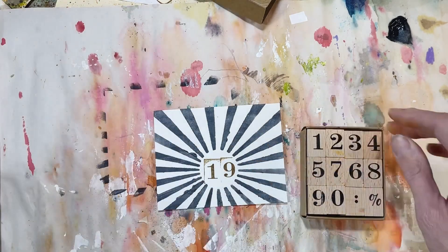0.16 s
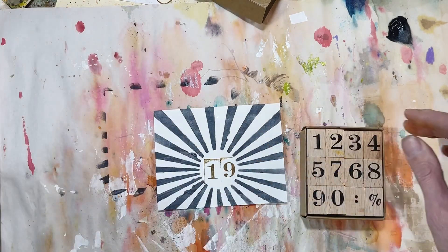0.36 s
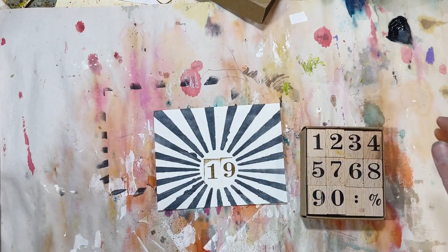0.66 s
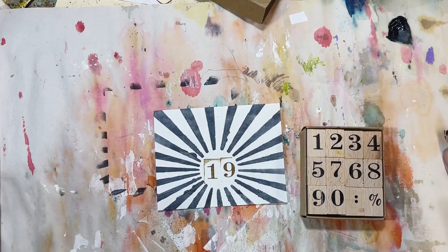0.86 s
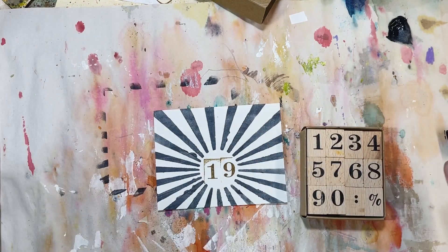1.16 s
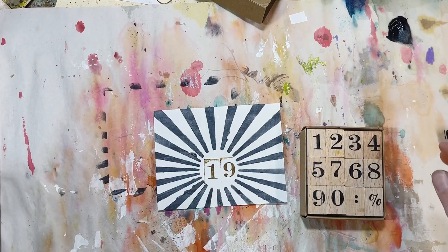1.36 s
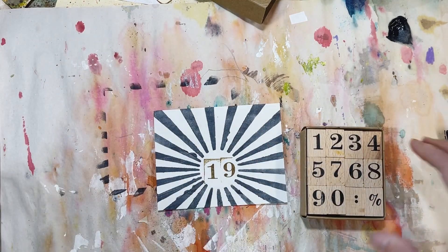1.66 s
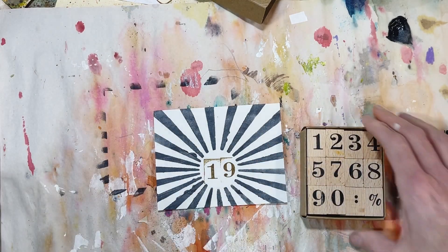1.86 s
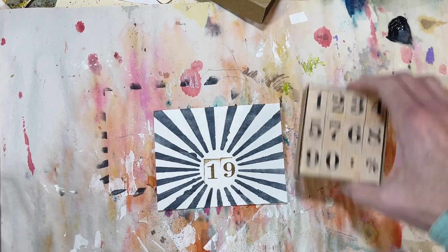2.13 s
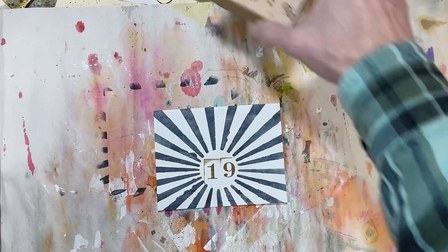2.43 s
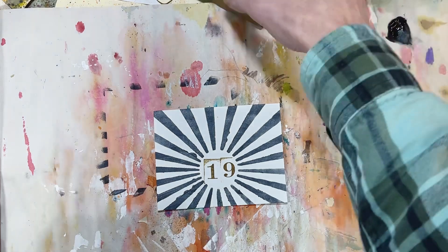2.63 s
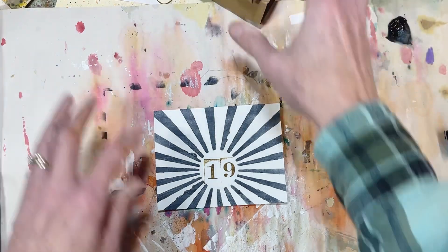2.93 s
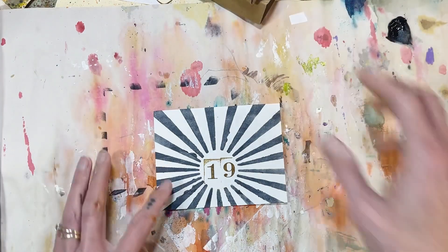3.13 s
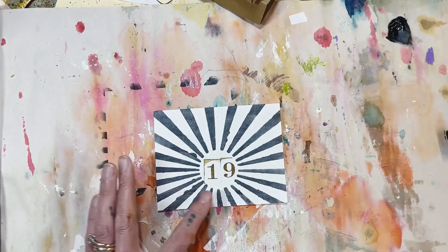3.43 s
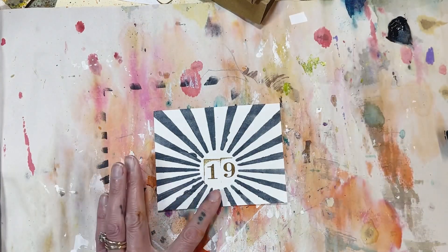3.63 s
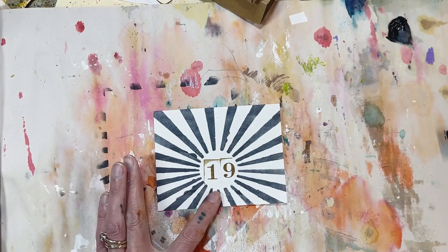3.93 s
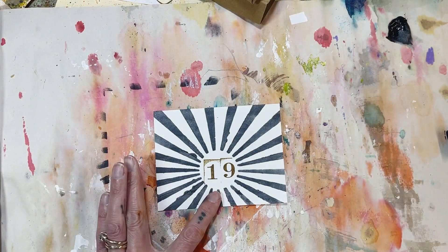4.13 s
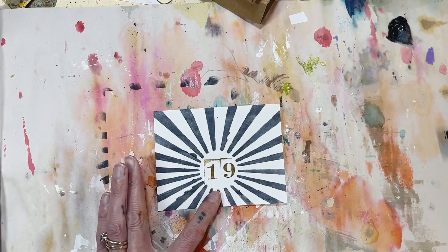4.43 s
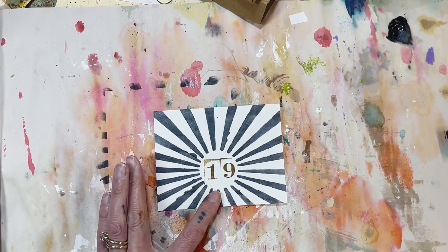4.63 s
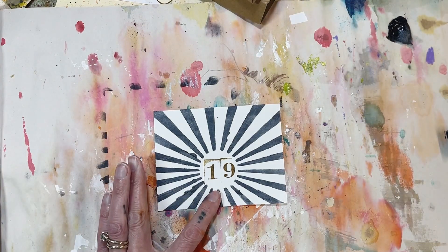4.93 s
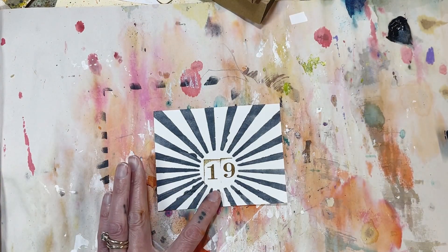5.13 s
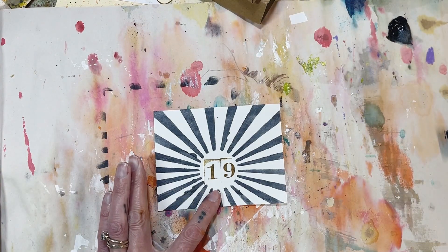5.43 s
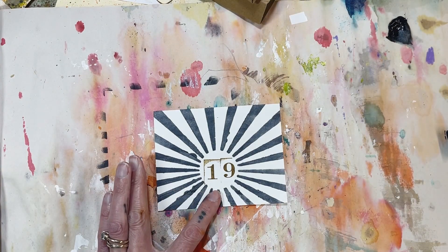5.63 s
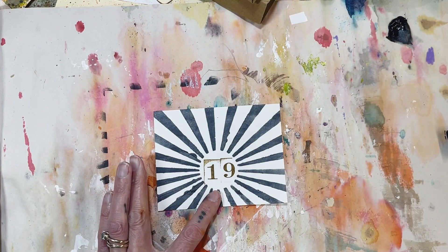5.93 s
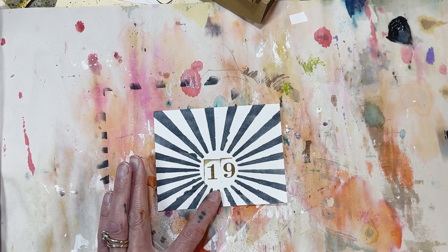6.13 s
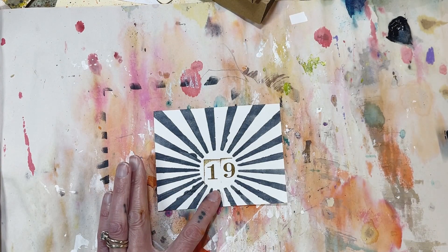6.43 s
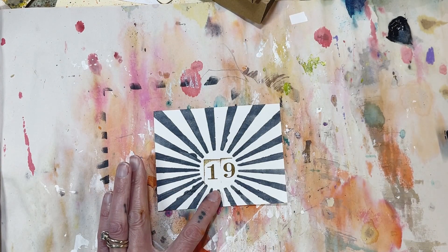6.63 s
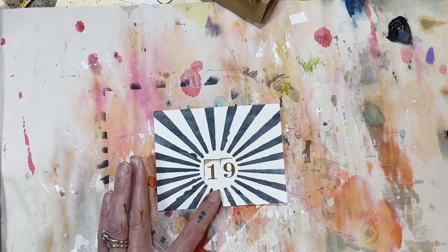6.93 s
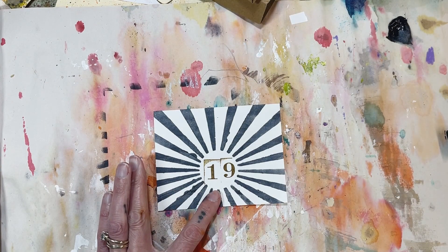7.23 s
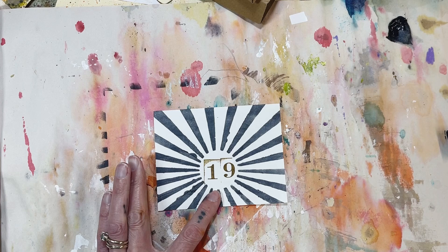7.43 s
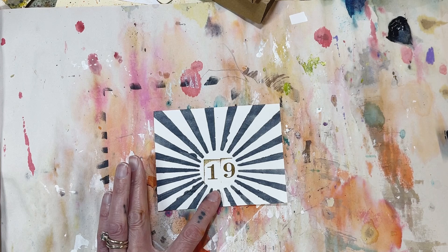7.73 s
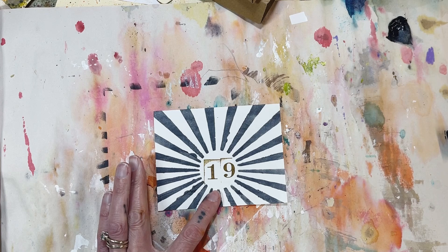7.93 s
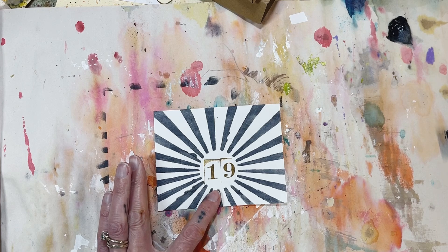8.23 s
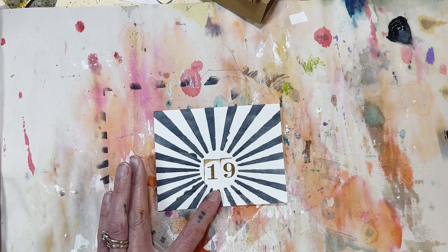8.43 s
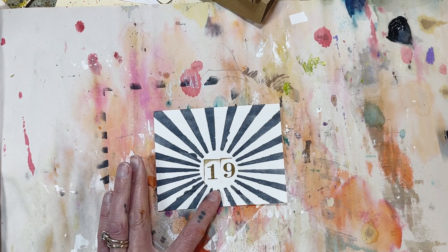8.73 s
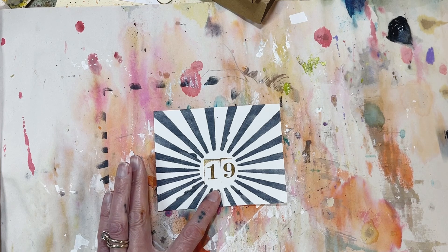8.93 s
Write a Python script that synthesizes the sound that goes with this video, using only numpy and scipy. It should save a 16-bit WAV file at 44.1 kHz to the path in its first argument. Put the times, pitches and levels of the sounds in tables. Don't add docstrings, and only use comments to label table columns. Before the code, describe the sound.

Throughout, a tiny camera focus motor chatters in a quick, slightly uneven tick-click-tick, roughly eight or nine cycles a second, with a thin whir and soft hiss. Faint hand brushing opens the scene. At 1.2 s a heavy dull table thump lands with a woody knock; a brighter crack and strong slide follow at 1.35, lighter taps at 1.6 and 1.75. The box is set down around 2.15-2.25, and knocked and slid at 2.6. A barely audible low hum lasts from 1.8 to 3.5. Hands are then nearly still, with faint rubs near 4.1. Pad knocks and scrapes come at 4.85 and 5.55-5.8. From 6.2, sharp taps and film crackles, snapping at 6.38; the crispest crackling burst runs 7.25-7.55. Smaller rustles come at 8.3; at 8.85 a snap and tiny high squeak, then a last knock at 9.03. Close microphone, small dry room.

```python
import sys
import numpy as np
from scipy import signal
from scipy.fft import rfft, irfft, next_fast_len
from scipy.io import wavfile
from scipy.ndimage import uniform_filter1d

SR = 44100
rng = np.random.default_rng(int(sys.argv[2]) if len(sys.argv) > 2 else 0)


def attenuation_scalar(level_db):
    decades = np.asarray(level_db, float) / 20
    return 10 ** decades


def inscribe(sig):
    pcm = np.round(np.clip(np.atleast_2d(sig).T, -1, 1) * 32767)
    wavfile.write(sys.argv[1], SR, pcm.astype(np.int16))


N = 400428


def evened(x):
    return x / np.sqrt(np.mean(x ** 2) + 1e-20)


def read(points, hz):
    f, value = np.transpose(points)
    return np.interp(np.log(hz + 1), np.log(f + 1), value)


def colour(x, points):
    size = next_fast_len(x.shape[-1])
    gain = attenuation_scalar(read(points, np.fft.rfftfreq(size, 1 / SR)))
    return irfft(rfft(x, size) * gain, size)[..., :x.shape[-1]]


def add(mix, s, sound):
    part = mix[max(round(s * SR), 0):][:len(sound)]
    part += sound[:len(part)]


def smooth_noise(count, width):
    noise = rng.standard_normal(count)
    return evened(uniform_filter1d(uniform_filter1d(noise, width), width))


def ring(modes, size=6000):
    t = np.arange(size) / SR
    h = np.zeros(size)
    for k, (hz, db, t60) in enumerate(modes):
        h += (-1) ** k * attenuation_scalar(db - 60 * t / t60) * np.sin(2 * np.pi * hz * t)
    return h / np.linalg.norm(h)


# [f/Hz, level/dB]
FLOOR = [(15, -51), (25, -29), (81, 11), (628, 6), (904, 30), (1060, -7), (1970, 25), (2630, -6),
         (5440, -73), (6870, 9.5), (8910, -19), (10200, -78), (12500, -63), (16200, -74), (22000, -120)]


def quiet_floor():
    hiss = rng.standard_normal((3, N))
    hiss = hiss[0] + .1 * hiss[1:]
    return attenuation_scalar(-72) * evened(colour(hiss, FLOOR))


# [t/s, level/dB]
HUM_LEVEL = [
    (1.8, -70),
    (1.842, -75),
    (2.13, -70),
    (3.55, -75),
]


def hum():
    s, db = np.transpose(HUM_LEVEL)
    t = np.arange(N) / SR
    level = attenuation_scalar(np.interp(t, s, db, -120, -120))
    return level * np.sqrt(2) * np.sin(2 * np.pi * 148 * t)


def room(x, t60=0.11):
    taps = rng.choice([-1., 1.], (2, 16000)) * (rng.random((2, 16000)) < .06)
    taps[:, :150] = 0
    hz, t, z = signal.stft(taps, SR, nperseg=256)
    differ = np.minimum(hz / 700, 1) ** 2 / (1 + (hz / 6000) ** 4)
    z[1] = z[0] + z[1] * differ[:, None]
    t60_by_pitch = t60 * (2000 / (hz[:, None] + 200)) ** 0.34
    tail = signal.istft(z * attenuation_scalar(-60 * t / t60_by_pitch), SR, nperseg=256)[1]
    return signal.oaconvolve(x[None], tail / np.linalg.norm(tail[0]), axes=1)[:, :N]


HUNT_AT_BOX = [-0.033, 0.087, 0.216, 0.356, 0.488, 0.626, 0.762, 0.894, 1.007, 1.111, 1.21, 1.335, 1.46,
               1.571, 1.706, 1.845, 1.973, 2.105, 2.237, 2.351, 2.456, 2.557, 2.668, 2.786, 2.912, 3.027,
               3.15]
HUNT_MIDDLE = [3.283, 3.404, 3.517, 3.628, 3.73, 3.835, 3.946, 4.059, 4.174, 4.302, 4.414, 4.532, 4.652,
               4.761, 4.863, 4.974, 5.078, 5.183, 5.291, 5.399, 5.518, 5.634, 5.743, 5.853, 5.962]
HUNT_UNWRAPPING = [6.073, 6.182, 6.295, 6.401, 6.515, 6.624, 6.736, 6.846, 6.967, 7.075, 7.183, 7.301,
                   7.413, 7.53, 7.648, 7.766, 7.879, 7.995, 8.11, 8.22, 8.324, 8.442, 8.559, 8.686, 8.828,
                   8.933, 9.06]


def hunting():
    out = np.array(HUNT_AT_BOX + HUNT_MIDDLE + HUNT_UNWRAPPING)
    back = out[:-1] + .0235 + .3 * np.diff(out)
    latch = back[1:] - .0265 + .002 * rng.standard_normal(len(back) - 1)
    return out[1:], back, latch


def gears(times, level_db, points, bite_db, hold_ms, fall_ms, jolt_db):
    ms, out = np.arange(3000) * 1000 / SR, np.zeros(N)
    for s in times:
        uneven_teeth = attenuation_scalar(0.72 * rng.standard_normal(len(ms)))
        clicks = rng.standard_normal(len(ms)) * uneven_teeth
        longer, harder = rng.uniform(-1, 1, 2)
        stop = hold_ms * (1 + 0.2 * longer)
        after = np.maximum(ms - stop, 0)
        shape = np.minimum(ms / .8, 1)
        shape = shape * (np.exp(-after / fall_ms) + 0.24 * np.exp(-after / 13))
        accents_db = bite_db * np.exp(-ms / 2.06) + jolt_db * np.exp(-((ms - stop) / 4.5) ** 2)
        add(out, s + .0008, attenuation_scalar(level_db + 1.7 * harder + accents_db) * shape * clicks)
    return colour(out, points)


# [f/Hz, level/dB]
HOUSING = [(770, -8), (1310, -8), (4480, -2), (915, -4), (1152, -4.5), (1507, -2.5), (1765, -5.5),
           (1937, 0.5), (2088, -0.5), (2217, -0.5), (2390, -5), (2659, -20), (2810, -13), (3057, -46),
           (3305, -8.5), (3854, -4), (4048, -8), (4748, 0), (5114, -15), (6147, -6), (6826, -0.5),
           (7504, 3), (8096, -5.5), (8484, 2), (8624, -18), (8936, 9), (9302, -46), (9808, -4), (10314, -2)]
# [f/Hz, level/dB]
OUT_COLOUR = [(550, -9.5), (750, -3), (3000, 3.5), (8000, 8), (10000, 6.5), (11000, 0), (12500, -33)]
# [f/Hz, level/dB]
BACK_COLOUR = [(550, -8.5), (750, -2), (3000, 6.5), (8000, 8), (10000, -0.5), (11000, 0.5), (12500, -44)]
# [f/Hz, level/dB]
LATCH_COLOUR = [(1000, -31), (5000, -18), (6500, -1), (8000, -12), (9500, 4), (11000, -14), (13500, -45)]
# [f/Hz, level/dB, t60/s]
WHIR = [
    (2110, 1.5, 0.0089),
    (4080, 2.5, 0.0041),
]


def focus_motor():
    out, back, latch = hunting()
    drive = gears(out, -47.5, OUT_COLOUR, bite_db=6.5, hold_ms=8.94, fall_ms=3.9, jolt_db=5)
    drive += gears(back, -45.5, BACK_COLOUR, bite_db=2.5, hold_ms=5.6, fall_ms=2.9, jolt_db=1.5)
    drive += gears(latch, -37, LATCH_COLOUR, bite_db=-8.7, hold_ms=2.1, fall_ms=0.48, jolt_db=9.9)
    housing = ring([(hz, db, 0.039 * (2000 / hz) ** 0.55) for hz, db in HOUSING])
    through_housing = signal.oaconvolve(drive, housing)[:N]
    whir = signal.oaconvolve(rng.standard_normal(N), ring(WHIR))[:N]
    return attenuation_scalar(-3) * through_housing + attenuation_scalar(-4.5) * drive + attenuation_scalar(-69.5) * whir


# [t/s, peak level/dB, last f/Hz, first f as a factor, t60/s]
THUMPS = [(0.405, -53.5, 136, 1.6, 0.27), (0.627, -42, 139, 2.43, 0.12), (1.211, -19, 149.3, 3.18, 0.11),
          (1.347, -31, 161, 1.6, 0.16), (1.592, -37, 177, 2.17, 0.18), (1.749, -45, 169, 3.2, 0.11),
          (2.001, -48, 148, 2.6, 0.19), (2.162, -32, 100, 1.53, 0.13), (2.223, -36.5, 74.7, 2.24, 0.22),
          (2.603, -49, 103, 2.3, 0.18), (4.058, -42, 71, 1.56, 0.12), (4.78, -36, 95, 2.1, 0.086),
          (5.038, -45, 72.7, 1.6, 0.13), (5.562, -24, 131.6, 3.5, 0.077), (5.699, -35.5, 108, 3.2, 0.13),
          (5.749, -32, 98.5, 2, 0.18), (6.134, -27, 139.5, 2.1, 0.1), (6.211, -37.5, 77, 3.2, 0.15),
          (6.912, -31.5, 126, 1.85, 0.053), (7.269, -28.5, 69, 2.3, 0.14), (8.316, -39.5, 70.2, 2.66, 0.13),
          (8.836, -42, 67, 3.1, 0.17), (9.029, -37, 99, 1.13, 0.19)]


def thumps():
    t, out = np.arange(12000) / SR, np.zeros(N)
    for s, db, hz, factor, t60 in THUMPS:
        wobble = smooth_noise(len(t), 150)
        falling_hz = hz * (1 + (factor - 1) * np.exp(-t / 0.0103))
        turns = np.cumsum(falling_hz * (1 + 0.35 * wobble)) / SR
        swing = np.sin(2 * np.pi * turns)
        swing += .5 * wobble[::-1] * np.sin(2 * np.pi * 1.7 * turns)
        fade = attenuation_scalar(db + 2.5 - 60 * t / np.clip(t60, .03, .6))
        add(out, s, fade * (1 - np.exp(-t / 0.01)) * swing)
    return out


# [t/s, peak level/dB, f/Hz, t60/s]
SQUEAK = (8.846, -38, 5850, 0.12)


def squeak():
    s, db, hz, t60 = SQUEAK
    t, out = np.arange(3000) / SR, np.zeros(N)
    waver = 1 + .01 * evened(uniform_filter1d(rng.standard_normal(len(t)), 100))
    whistle = np.sin(2 * np.pi * np.cumsum(hz * waver) / SR)
    add(out, s, attenuation_scalar(db - 60 * t / t60) * np.minimum(t / .004, 1) * whistle)
    return out


# [peak t/s, fade t/s, table rumble level/dB, sliding wood level/dB, crinkle level/dB]
BOX_MOVES = [
    (0.001, .3, -64, -57, -63),
    (.478, .05, -72, -63, -62),
    (1.22, .12, -44, -58, -66),
    (1.36, .09, -42.5, -41, -42.5),
    (1.59, .1, -60, -53, -66),
    (2.0, .15, -68, -65, -59),
    (2.15, .11, -46, -51, -53),
    (2.22, .25, -48, -64, -67),
    (2.61, .08, -43, -51, -52.5),
    (3.25, .7, -80, -68, -75),
]
PAD_MOVES = [(4.1, .15, -60, -75, -70), (4.19, .14, -57, -52.5, -54), (4.86, .14, -51, -41.5, -60),
             (5.02, .12, -58, -51, -62), (5.22, .4, -66, -64, -63), (5.45, .2, -67, -46, -60),
             (5.57, .15, -56, -55, -56), (5.69, .1, -55, -54, -54), (5.78, .13, -45, -39.5, -60),
             (6.2, .07, -46, -50, -68), (6.27, .3, -54, -58, -53), (6.48, .3, -56, -59, -53),
             (6.67, .12, -53, -59, -61), (6.92, .15, -53, -57, -58), (7.07, .35, -52, -57, -59),
             (7.28, .11, -41.5, -48, -44.5), (7.48, .2, -53, -52.5, -47), (8.3, .19, -52, -50, -47.5),
             (8.47, .15, -59, -70, -68), (8.68, .25, -58, -66, -66), (8.83, .2, -54, -52.5, -49),
             (9.02, .15, -59, -49, -52)]
# [table rumble level/dB, sliding wood level/dB, crinkle level/dB]
REST_DB = (-74, -85, -76)


def effort():
    t = np.arange(0, N + 64, 64) / SR
    power = attenuation_scalar(np.array(REST_DB))[:, None] ** 2 * np.ones(len(t))
    for moves, rise in ((BOX_MOVES, .3), (PAD_MOVES, .5)):
        for s, fade, *levels_db in moves:
            away = np.maximum(t - s, (s - t) / rise) / fade
            power = power + attenuation_scalar(np.array(levels_db)[:, None] - 20 * away) ** 2
    return [np.interp(np.arange(N) / SR, t, np.sqrt(row)) for row in power]


def grains(per_s, spread_db, points):
    uneven = attenuation_scalar(spread_db * np.minimum(rng.exponential(1, N), 5))
    clicks = uneven * rng.standard_normal(N) * (rng.random(N) < per_s / SR)
    return evened(colour(clicks, points))


# [f/Hz, level/dB]
RUMBLE = [(25, -61), (45, -4.5), (65, 6), (110, 0.5), (150, -0.5), (250, -31.5)]
# [f/Hz, level/dB]
SLIDE = [(150, -18), (250, 0), (500, -4), (800, -6), (1500, -17), (2500, -14), (4000, -37), (10500, -40),
         (12500, -90)]
# [f/Hz, level/dB]
CRINKLE = [(600, -21), (1500, 8.5), (2500, 9), (5000, 7.5), (8000, 9), (10500, 14), (14500, -54.5)]


def handling():
    rumble, slide, crinkle = effort()
    low = rumble * evened(colour(rng.standard_normal(N), RUMBLE))
    wood = slide * grains(3500, 2.2, SLIDE)
    clumps = attenuation_scalar(2.5 * smooth_noise(N, 300))
    film = crinkle * evened(clumps * grains(14000, 3, CRINKLE))
    return attenuation_scalar(0.5) * low + wood + attenuation_scalar(8) * film


# [f/Hz, level/dB, t60/s]
WOOD = [(330, -10, 0.15), (484, 2.5, 0.066), (647, -6.5, 0.1), (730, -1.5, 0.066), (836, -7, 0.09),
        (1080, 3.5, 0.015), (1250, -13, 0.087), (1512, 1, 0.021), (1650, -6, .035), (2280, -45, 0.085),
        (3680, -31, 0.034)]
# [t/s, peak level/dB, brightness f/Hz, contact t/ms, wood ring under the peak level/dB]
BOX_KNOCKS = [(1.2162, -34, 1020, 4.5, -2.5), (1.249, -35, 420, 4.7, -21), (1.3385, -23.5, 3200, 5, -14),
              (1.3531, -20, 5000, 5.1, -8), (1.574, -37, 596, 5.6, -24), (1.589, -41, 3520, 6, -1.5),
              (1.742, -44.5, 1130, 3.4, -22), (2.1466, -42, 5700, 3.1, -16), (2.155, -37, 1680, 14, -45),
              (2.1715, -39.5, 2200, 4.1, -28), (2.2431, -25.5, 2500, 3.5, -30), (2.58, -36.5, 1000, 2, -24),
              (2.6018, -27, 5260, 7.2, -24), (2.602, -29, 1170, 4, -13)]
PAD_KNOCKS = [(4.838, -38, 1450, 10, -11), (4.862, -37, 1500, 12, -16), (4.8908, -37, 1330, 6.6, -12),
              (5.6946, -36.5, 2530, 11, -4), (5.7478, -22, 2500, 2.9, -12.5), (5.7577, -27, 2200, 3.1, -16),
              (5.7649, -33, 1720, 2.1, -2), (5.7758, -33, 2200, 8.2, -9), (6.2064, -24, 7000, 1.2, -18),
              (6.2236, -31.5, 5100, 2.8, -17), (6.4865, -29.5, 1480, 2.7, -15.5),
              (6.891, -35.5, 750, 3.2, -22), (7.2626, -28.5, 6020, 5.2, -17),
              (7.5435, -40.5, 5600, 5.5, -16), (9.0259, -26.5, 4300, 2, -14.5)]
# [t/s, peak level/dB, brightness f/Hz, contact t/ms]
SNAPS = [(6.243, -34, 5070, 6.6), (6.3124, -39, 8590, 6.1), (6.3283, -30, 9700, 3.1),
         (7.335, -32, 14500, 15), (7.48, -30, 14000, 14), (6.3819, -18, 14600, 3.3), (6.3815, -19, 9700, 5),
         (6.4029, -30, 4630, 7.4), (6.4118, -29.5, 4660, 6.1), (7.25, -39, 6880, 8.7),
         (7.2676, -28, 4400, 5), (7.2772, -22.5, 9700, 6.7), (7.2784, -5, 14600, 4.8),
         (7.3017, -29, 9600, 3.6), (7.311, -36.5, 7580, 15), (7.383, -31.5, 9100, 5),
         (7.4267, -35, 6170, 4.1), (7.4426, -17, 9400, 2.2), (7.456, -26, 8580, 2.5),
         (7.5034, -29.5, 6200, 3.7), (7.5319, -31, 7300, 2.0), (8.2812, -30.5, 5200, 3.3),
         (8.3108, -42.5, 6150, 18), (8.3241, -31, 4870, 5.6), (8.8332, -23.5, 7800, 2),
         (8.8404, -40, 4220, 15), (8.8475, -39, 6400, 5.2)]


def hits():
    ms, crack, blow = np.arange(1024) * 1000 / SR, np.zeros(N), np.zeros(N)
    hz = np.fft.rfftfreq(len(ms), 1 / SR) + 1
    snaps = [(*snap, -31) for snap in SNAPS]
    for s, db, bright_hz, contact_ms, wood_db in BOX_KNOCKS + PAD_KNOCKS + snaps:
        grit = rng.standard_normal(len(ms))
        octaves = np.log2(hz / bright_hz)
        narrow = 3.5 + 150 * (bright_hz > 12000)
        band = attenuation_scalar(-narrow * octaves ** 2 - 3.3 * np.maximum(octaves, 0))
        shape = (1 - np.exp(-ms / 0.39)) * np.exp(-ms / (0.56 * contact_ms))
        add(crack, s, attenuation_scalar(db + 7.5) * shape * evened(irfft(rfft(grit) * band)))
        add(blow, s, attenuation_scalar(db + wood_db + 15.5) * shape * grit)
    return crack + signal.oaconvolve(blow, ring(WOOD))[:N]


def scene():
    motor = focus_motor()
    knocks = hits() + handling()
    echoes = room(attenuation_scalar(-16.5) * motor + attenuation_scalar(-12.5) * knocks)
    return quiet_floor() + hum() + echoes + motor + thumps() + squeak() + knocks


# [f/Hz, level/dB]
MIC = [(25, -12), (40, -1), (70, 0), (120, -2), (10500, -2), (11500, -3.5), (12300, -19), (13500, -27),
       (14500, -25), (15500, -33), (16500, -45)]
# [f/Hz, phase/rad]
PORT_LEAD = [(540, -.1), (700, -1.3), (810, -2.5), (875, -5.1), (1250, -6.3), (1850, -6.2), (4200, -5.2),
             (4740, -4), (5500, -.1), (6030, .1), (8600, 2.9), (9400, 3.3), (12200, 6.3), (15500, 8.2)]


def microphone(dry):
    size, turn_hz = next_fast_len(N), 1850
    hz = np.fft.rfftfreq(size, 1 / SR)
    left = read(PORT_LEAD, np.minimum(hz, turn_hz))
    right = read(PORT_LEAD, turn_hz) - read(PORT_LEAD, np.maximum(hz, turn_hz))
    ports = np.exp(1j * np.array([left, right]))
    return irfft(rfft(dry, size) * ports * attenuation_scalar(read(MIC, hz)), size)[:, :N]


def roll_off(x):
    return signal.sosfilt(signal.butter(12, 16490, fs=SR, output="sos"), x)


def record(dry):
    mix = microphone(dry)
    return roll_off(mix)


dry = scene()
out = record(dry)
inscribe(out)
```